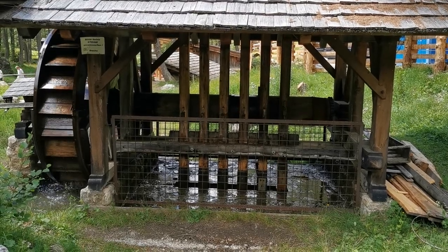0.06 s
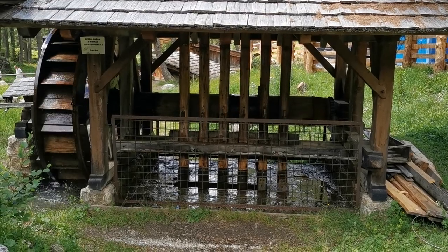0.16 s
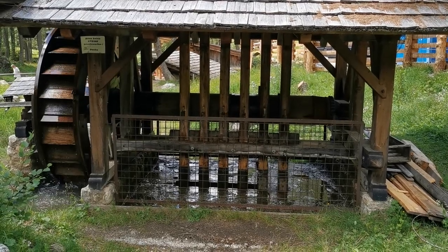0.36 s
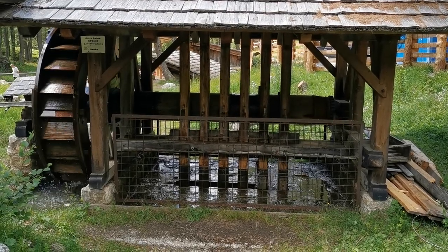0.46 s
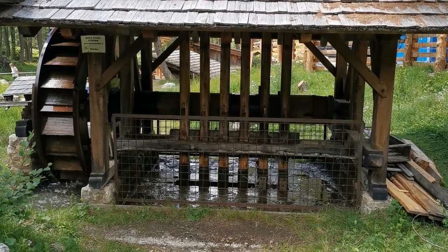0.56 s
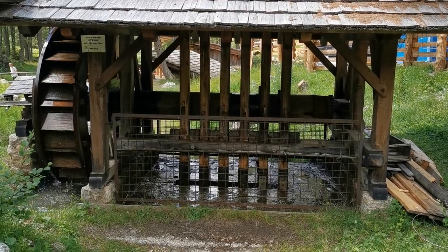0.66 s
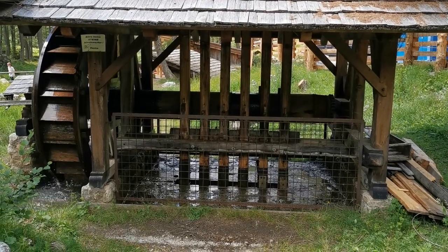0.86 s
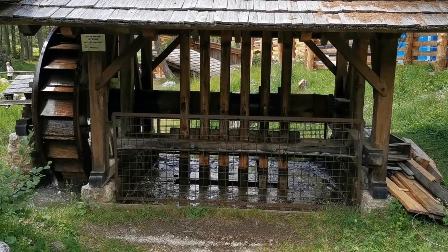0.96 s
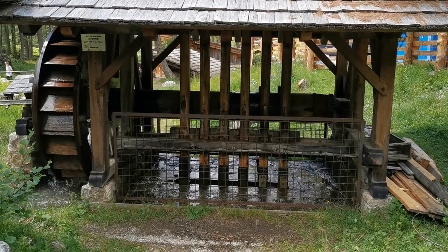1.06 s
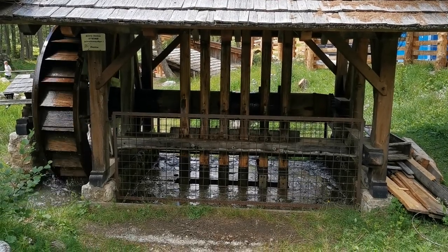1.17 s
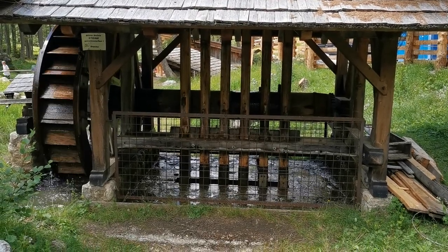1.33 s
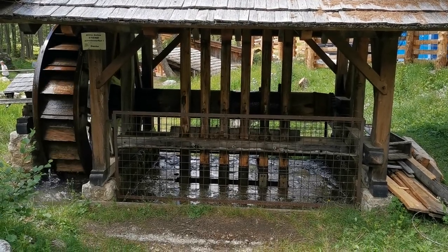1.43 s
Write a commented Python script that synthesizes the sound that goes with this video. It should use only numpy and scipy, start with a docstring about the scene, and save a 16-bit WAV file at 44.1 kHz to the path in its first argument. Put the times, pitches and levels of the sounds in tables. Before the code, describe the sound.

Stamps of a water mill drop with sharp metallic clanks, wooden knocks and splashes.

```python
"""Water-driven stamp mill

Outdoors, a few metres away. Iron-shod wooden stamps drop into a flooded trough: each one clangs,
chatters, jangles, rebounds and throws up water. Cams knock on the timber frame,
the wheel and its shaft rumble, and the mill race runs underneath it all."""
import sys
import numpy as np
from scipy import signal
from scipy.fft import rfft, irfft
from scipy.io import wavfile

SR = 44100
rng = np.random.default_rng(int(sys.argv[2]) if len(sys.argv) > 2 else 0)


def to_wav(sig):
    """Store sig (one row per channel, or 1-D mono) as 16-bit WAV at the path in sys.argv[1].

    Samples outside -1..1 are clipped; the rate is SR.
    """
    pcm = np.clip(np.atleast_2d(sig), -1, 1) * 32767
    pcm = np.round(pcm).astype(np.int16)
    wavfile.write(sys.argv[1], SR, pcm.T)  # frames by channels


N = 66150
T = np.arange(N) / SR
BIN_HZ = np.arange(N // 2 + 1) * SR / N


def undb(db):
    """Decibels to gain."""
    return 10 ** (np.asarray(db) / 20)


def unit(x):
    """Scale to an rms of 1."""
    return x / np.sqrt(np.mean(x ** 2) + 1e-20)


def curve(points):
    """Draw a curve through (Hz, value) points, over every frequency bin."""
    hz, value = np.array(points, float).T
    return np.interp(np.log(BIN_HZ + 1), np.log(hz), value)


def sway(db, count):
    """A gain that wanders through count random levels."""
    return undb(db * np.interp(T, np.linspace(0, T[-1], count), rng.standard_normal(count)))


def envelope(start, rise, hold, t60):
    """Linear attack, then an exponential release once both rise and hold (from the start) are over."""
    age = T - start
    attack = np.clip(age / max(rise, 1e-4), 0, 1)
    return attack * np.exp(-np.log(1000) * np.maximum(age - max(hold, rise), 0) / t60)


# Stereo image. Each row: frequency in Hz, likeness of left and right (clipped to between 0 and 0.999).
STEREO_LIKENESS = [(60, 3), (300, 0.7), (600, 0.67), (1200, 0.53), (2300, 0.04), (4500, 0.14),
                   (9000, -0.09)]
def stereo(pair, gain):
    """Colour two unrelated signals and blend them: alike in the bass, wide in the treble."""
    mid, side = rfft(pair) * gain
    alike = np.clip(curve(STEREO_LIKENESS), 0, .999)
    mid, side = mid * np.sqrt(1 + alike), side * np.sqrt(1 - alike)
    return unit(irfft([mid + side, mid - side], N))


def grains(eq, per_s, spread_db, resonance=1):
    """A dense texture of tiny uneven clicks, shaped by an EQ curve, at an rms of 1."""
    size = undb(spread_db * np.minimum(rng.exponential(size=(2, N)), 4))
    clicks = (rng.random((2, N)) < per_s / SR) * size * rng.choice([-1, 1], (2, N))
    return stereo(clicks, undb(curve(eq)) * resonance)


def ring(start, hz, t60, gain, rise, width_rad=0, scatter_cycles=1):
    """Struck modes of unit strength together; scatter puts modes out of step, width the two channels."""
    out = np.zeros((2, N))
    for f, decay, g in zip(hz, t60, gain / np.linalg.norm(gain)):
        phase = 2 * np.pi * scatter_cycles * rng.random() + width_rad * rng.standard_normal((2, 1))
        tone = np.sin(2 * np.pi * f * (T - start - rise) + phase)
        out += g * np.sqrt(2) * envelope(start, rise, 0, decay) * tone
    return out


def favour(hz, centre, spread):
    """The place of a blow favours the modes within spread octaves of centre."""
    return 1 / (1 + (np.log2(hz / centre) / spread) ** 2) ** 2


def swells(rows):
    """One level contour from overlapping swells, added in power."""
    return np.sqrt(sum((undb(db) * envelope(start, rise, hold, t60)) ** 2
                       for start, db, rise, hold, t60 in rows))


# Tone of the running water. Each row: frequency in Hz, relative level in dB.
RACE_EQ = [(180, -39), (300, -27), (348, -8), (412, -25.5), (667, -7.5), (1040, -19.5), (1230, -15),
           (1720, -16.5), (2030, -6), (4160, -19), (5800, -16), (7200, -28.5), (16000, -38.5)]
RACE_DB, BUBBLE_DB, BUBBLES_PER_S = -45.5, -55, 380
BUBBLE_CYCLES, BUBBLE_GLIDE = 40, 0.19  # cycles to fade by 40 dB, fractional pitch rise in that time
def mill_race():
    """The bed of running water: fine crackle and small bubbles that glide upward."""
    crackle = undb(RACE_DB) * sway(db=.5, count=40) * grains(RACE_EQ, per_s=7000, spread_db=3)
    age, bubbles = T[:SR // 20], np.zeros((2, N + SR // 20))
    for when, pitch, size, pan in rng.random((int(BUBBLES_PER_S * N / SR), 4)):
        hz, at = 550 * 2 ** (3.2 * pitch), int(when * N)
        life = age * hz / BUBBLE_CYCLES
        glide = 1 + BUBBLE_GLIDE * np.minimum(life, 2) / 2
        tone = np.sin(2 * np.pi * hz * age * glide) * 100 ** -life
        bubbles[:, at:at + len(age)] += size ** 2 * np.sqrt([[pan], [1 - pan]]) * tone
    return crackle + undb(BUBBLE_DB) * unit(bubbles[:, :N])


# Resonances of the wheel and shaft. Each row: centre in Hz, width in Hz, relative level in dB.
WHEEL_RESONANCES = [(35, 52, 1), (74, 13, -6), (109.3, 26, 0), (197, 93, -2), (290.6, 36, 0.5),
                    (356, 8.2, -3.5)]
WHEEL_DB = -47
def wheel_rumble():
    """The turning wheel keeps the low resonances of the woodwork rumbling."""
    bins = BIN_HZ + 1
    power = sum(undb(db) ** 2 / width / (1 + ((bins - hz ** 2 / bins) / width) ** 2)
                for hz, width, db in WHEEL_RESONANCES)
    return undb(WHEEL_DB) * sway(db=2, count=16) * stereo(rng.standard_normal((2, N)), np.sqrt(power))


# Low thumps. Each row: start in seconds, level in dB, pitch in Hz, attack and t60 in seconds.
SHAFT_THUDS = [(.003, -37.5, 75.7, 0.0023, 0.27), (0.232, -34.5, 90, 0.0051, 0.16),
               (0.284, -34.5, 35.4, 0.06, 0.49), (0.289, -27, 93.3, 0.007, 0.32),
               (0.29, -39, 141.5, 0.0033, 0.43), (0.371, -30, 118, 0.0061, 0.19),
               (.50, -35.5, 59.4, 0.019, 0.76), (0.565, -24.5, 87.4, 0.035, 0.12),
               (1.385, -38.5, 110, 0.017, 0.35)]
def shaft_thuds():
    """The shaft thuds in its bearings, each time one dull, fading tone."""
    return sum(undb(db) * envelope(start, rise, 0, t60) * np.sin(2 * np.pi * hz * (T - start))
               for start, db, hz, rise, t60 in SHAFT_THUDS)


# Body of the timber frame. Each row: pitch in Hz, base t60 in seconds, relative level in dB.
FRAME_MODES = [(153.4, 0.39, 3), (174, 0.63, -6.5), (194.6, 0.41, 4.5), (276.2, 0.66, -2),
               (301.4, 0.18, -0.5), (463, 0.28, 6.5), (558.5, 0.57, 8.5), (610, 0.18, 10), (732, 0.11, 18),
               (792, 0.1, 18), (1234, 0.13, 17)]
# Hits on the frame. Each row: start in seconds, level in dB, tonal centre in Hz, spread in octaves,
# attack in seconds, multiplier on the modes' t60, rattle against the ring in dB.
CAM_KNOCKS = [(.229, -23.5, 188, 0.35, 0.005, 0.3, -11), (0.2296, -25.5, 590, 0.4, 0.0011, 0.5, -6),
              (.254, -38, 280, 0.57, 0.0026, 0.37, -11), (.291, -26, 183.6, 1.5, 0.003, 0.6, -5),
              (.290, -29, 720, .25, .001, .3, -8), (.405, -36, 200, 1.2, 0.0041, 1.5, -1.5),
              (.493, -21.5, 286, 0.3, 0.008, 0.38, -13), (.493, -27.5, 560, 0.4, 0.006, 0.5, -9),
              (0.4938, -37, 1200, 0.55, 0.0017, .3, -4.5), (.572, -36, 268, 0.3, 0.0068, 0.7, -8)]
def cam_knocks():
    """Cams ring and rattle the frame, each knock favouring its own range of modes."""
    hz, t60, mode_db = np.array(FRAME_MODES).T
    out = 0
    for start, db, centre, spread, rise, length, rattle_db in CAM_KNOCKS:
        noise = stereo(rng.standard_normal((2, N)), favour(BIN_HZ + 1, centre, spread))
        rattle = noise * envelope(start, rise, hold=0, t60=0.28)
        gains = undb(mode_db) * favour(hz, centre, spread)
        body = ring(start, hz, t60 * length, gains, rise, scatter_cycles=0.26)
        out = out + undb(db) * (body + undb(rattle_db) * rattle)
    return out


# Showers of drops. Each row: start in seconds, level in dB, then attack, hold and t60 in seconds.
SPRAY_SWELLS = [(.17, -49.5, 0.023, 0.13, .2), (.50, -42, 0.16, 0.3, 0.91), (.76, -36, 0.016, 0.11, 0.93),
                (.85, -40.5, 0.095, 0.095, 0.42)]
# Tone of the spray. Each row: frequency in Hz, relative level in dB.
SPRAY_EQ = [(200, -31), (700, -1.5), (1400, -6), (2200, 3.5), (3200, 0.5), (4300, -15), (5600, -5.5),
            (7500, -19), (10000, -14), (13000, -35), (16000, -31)]
def falling_spray():
    """Thrown water patters back down in clumps."""
    clumps = sway(db=1.8, count=110)
    return swells(SPRAY_SWELLS) * clumps * grains(SPRAY_EQ, per_s=2500, spread_db=0.5)


# Single slaps of water. Each row: start in seconds, level in dB, t60 in seconds.
SLAP_HITS = [(.651, -41.5, 0.092), (0.856, -40.5, 0.07), (.892, -37, 0.044), (0.92, -33, 0.12),
             (0.956, -39.5, 0.11)]
# Tone of a slap. Each row: frequency in Hz, relative level in dB.
SLAP_EQ = [(500, -6.5), (2500, 10), (5000, 8), (8000, 1.5), (11500, 0), (15000, -26)]
WATER_GRAIN = dict(per_s=9000, spread_db=2)
def water_slaps():
    """Some of the water lands in short, bright slaps."""
    level = sum(undb(db) * envelope(start, rise=0.0011, hold=0, t60=t60) for start, db, t60 in SLAP_HITS)
    return level * grains(SLAP_EQ, **WATER_GRAIN)


# Water thrown up. Each row: start in seconds, level in dB, then attack, hold and t60 in seconds.
SPLASH_SWELLS = [(.2285, -26.5, 0.00041, 0.0038, 0.49), (.290, -27, 0.0099, 0.037, 0.82),
                 (.405, -39, 0.0028, 0.036, 0.064), (.716, -28, 0.0043, 0.046, 0.16),
                 (1.1445, -29, 0.0063, 0.065, 0.21)]
# Tone of a splash. Each row: frequency in Hz, relative level in dB.
SPLASH_EQ = [(150, -41), (450, -3), (750, 3.5), (1500, 0.5), (2200, 3), (3100, 1), (3900, -4.5), (4700, -5),
             (5600, -7.5), (7500, -16.5), (8500, -13), (10200, -18), (12800, -31), (15500, -29)]
SCRAPE_WIDTH_HZ, SCRAPE_DB = 24.6, -3  # width of the iron's resonances, level against the water
def splashes():
    """Water bursts out as the shoes scrape into the trough, exciting the iron's resonances."""
    iron = np.sqrt(sum(1 / (1 + ((BIN_HZ - mode[0]) / SCRAPE_WIDTH_HZ) ** 2) ** 2
                       for mode in SHOE_MODES + SHOE_HIGH_PARTIALS))
    scrape = undb(SCRAPE_DB) * grains(SPLASH_EQ, **WATER_GRAIN, resonance=iron)
    water = grains(SPLASH_EQ, **WATER_GRAIN)
    return swells(SPLASH_SWELLS) * unit(water + scrape)


# High partials of the iron shoes. Each row: pitch in Hz, relative level in dB.
SHOE_HIGH_PARTIALS = [(3662, 10), (3950, 1), (5098, 0), (5256, 8), (5744, 5), (6058, 2), (6925, -6),
                      (7475, -5), (8107, -2), (8349, -4), (8597, -3), (8731, -3), (9105, -3), (9655, -9),
                      (9874, -6), (10020, -7), (11650, -12), (15650, -14)]
# Touches that set the iron jangling. Each row: start in seconds, level in dB, attack and t60 in seconds,
# tonal centre in Hz, spread in octaves.
IRON_TOUCHES = [(.290, -34, 0.03, 0.15, 5040, 2.4), (.372, -38, .005, 0.15, 5256, .1),
                (.412, -37.5, 0.008, 0.15, 3640, .15), (.716, -29.5, 0.014, 0.28, 6640, 1.6),
                (.738, -35, .012, 0.14, 3960, 0.56), (1.1445, -40, 0.016, 0.43, 6900, 0.92),
                (1.174, -35, .005, 0.096, 5200, 0.075), (1.205, -28.5, 0.007, 0.099, 3850, 0.71)]
def iron_jangle():
    """After each blow the shoe's high partials swell and fade, different ones at each touch."""
    hz, mode_db = np.array(SHOE_HIGH_PARTIALS).T
    out = 0
    for start, db, rise, t60, centre, spread in IRON_TOUCHES:
        gains = undb(mode_db) * favour(hz, centre, spread)
        out = out + undb(db) * ring(start, hz, np.full(len(hz), t60), gains, rise, width_rad=1)
    return out


# Sharp transients. Each row: start in seconds, level in dB, t60 in seconds.
SNAP_HITS = [(0.2304, -30.5, 0.08), (.2900, -28.5, 0.038), (0.717, -34, 0.029), (1.145, -36, 0.022)]
# Tone of a snap. Each row: frequency in Hz, relative level in dB.
SNAP_EQ = [(600, -33), (2500, 12.5), (6000, 6), (10000, 2.5), (15000, -17)]
CHATTER_GRAIN = dict(per_s=12000, spread_db=3.5)
CRACK_RISE_S = 0.00018
def contact_snaps():
    """The first hard contact gives a brief, bright snap."""
    level = sum(undb(db) * envelope(start, CRACK_RISE_S, 0, t60) for start, db, t60 in SNAP_HITS)
    return level * grains(SNAP_EQ, **CHATTER_GRAIN)


# Clang of the iron-shod stamps. Each row: pitch in Hz, base t60 in seconds,
# then relative level in dB for stamps 0, 1 and 2.
SHOE_MODES = [(1191, 0.21, -10, -12, -4), (1743, 0.24, -9, -3, -5), (1965, 0.28, 5, 2, -9),
              (2088, 0.24, 2, 6.5, 3), (2315, .13, -1, -3, 0), (2420, 0.15, -6, -6, -1),
              (2487, 0.15, -12, -12, 1), (2769, 0.25, -12, -20, 2), (3205, 0.15, -2, 0, -20)]
# Tone of the crack. Each row: frequency in Hz, relative level in dB.
CRACK_EQ = [(200, -45), (650, -6), (1500, -12), (1850, -7.5), (2150, 10.5), (2500, -4), (3150, 1.5),
            (4000, -50), (5600, -10), (7500, -58), (10000, -24), (15000, -45)]
# Blows and rebounds. Each row: start in seconds, crack level in dB, crack t60 in seconds,
# clang level in dB, multiplier on the modes' t60, which stamp falls.
STAMP_BLOWS = [(.290, -17, 0.24, -18.5, 0.88, 0), (.3615, -21, 0.03, -29.5, 0.42, 0),
               (.409, -27, 0.2, -28, 0.75, 0), (.7162, -14.5, 0.041, -18, 0.85, 1),
               (0.7356, -21, 0.042, -21.5, 0.91, 1), (.750, -26, 0.031, -24, 0.54, 1),
               (1.144, -19.5, 0.12, -18.5, 0.33, 2), (1.166, -32, 0.19, -23.5, 0.92, 2),
               (1.2026, -32, 0.15, -22.5, 0.66, 2)]
def stamps():
    """Each blow in the trough is a crack of dense chatter and a clang of the iron shoe."""
    hz, t60, *mode_db = np.array(SHOE_MODES).T
    chatter = grains(CRACK_EQ, **CHATTER_GRAIN)
    out = 0
    for start, crack_db, crack_t60, clang_db, length, stamp in STAMP_BLOWS:
        crack = envelope(start, CRACK_RISE_S, 0, crack_t60) * chatter
        gains = undb(mode_db[round(stamp)])
        clang = ring(start, hz, t60 * length, gains, rise=0.001728, width_rad=1, scatter_cycles=0.33)
        out = out + undb(crack_db) * crack + undb(clang_db) * clang
    return out


def scene():
    """The mill at work beside its race."""
    iron = stamps() + iron_jangle() + contact_snaps()
    thrown_water = splashes() + falling_spray() + water_slaps()
    woodwork = cam_knocks() + shaft_thuds() + wheel_rumble()
    return iron + thrown_water + woodwork + mill_race()


# Colour of the two microphone ports. Each row: frequency in Hz, level of left against right in dB.
PORT_BALANCE = [(60, 2.5), (220, 3), (400, -2.5), (700, -3.5), (1300, -3.5), (2000, -11.5), (2600, -25),
                (3600, -1.5), (5500, -12), (7500, 5), (9000, 0.5), (14000, -.5)]
TOP_HZ = 16000
def record(dry):
    """The right port resonates in the presence range and the left is dull there; the top is cut."""
    tilt = undb(curve(PORT_BALANCE) / 2)
    ports = np.array([tilt, 1 / tilt])
    heard = irfft(rfft(dry) * ports / np.sqrt(np.mean(ports ** 2, axis=0)), N)
    high_cut = signal.ellip(8, .2, 70, TOP_HZ, fs=SR, output="sos")
    return signal.sosfilt(high_cut, heard)


dry = scene()
out = record(dry)
to_wav(out)
```